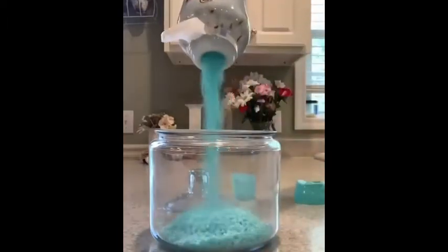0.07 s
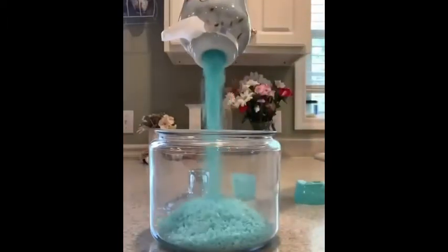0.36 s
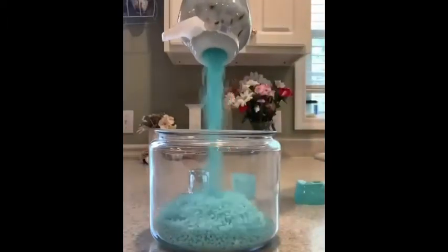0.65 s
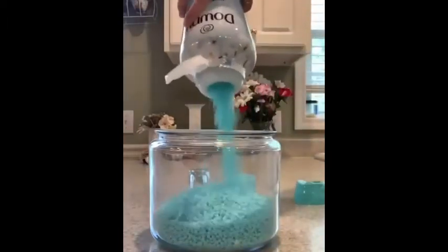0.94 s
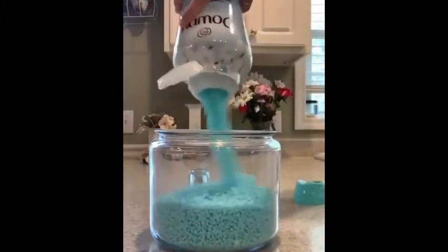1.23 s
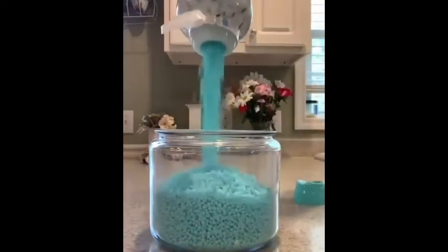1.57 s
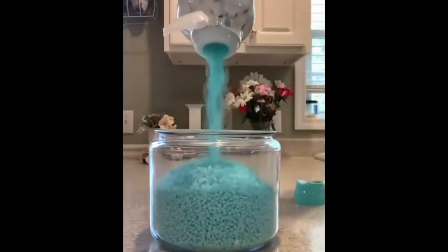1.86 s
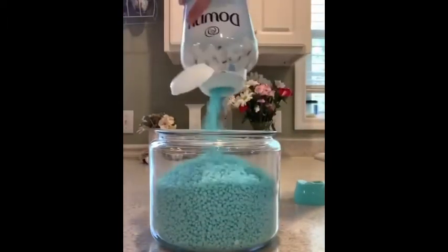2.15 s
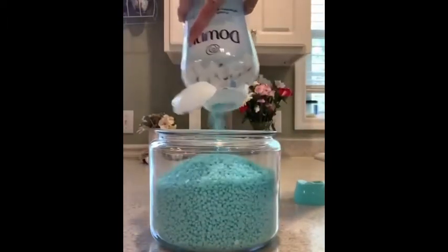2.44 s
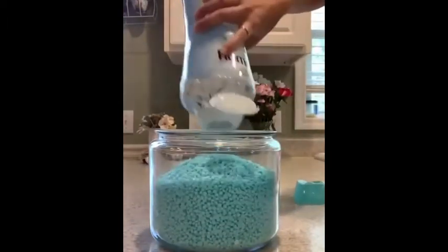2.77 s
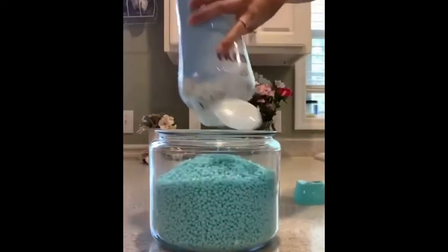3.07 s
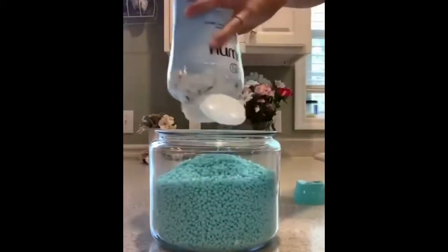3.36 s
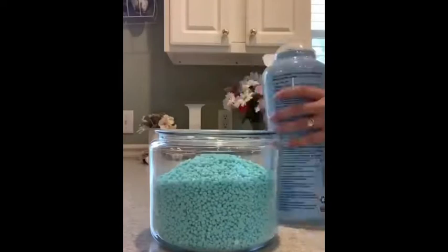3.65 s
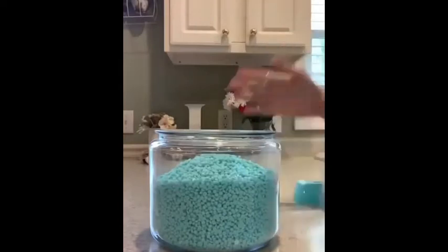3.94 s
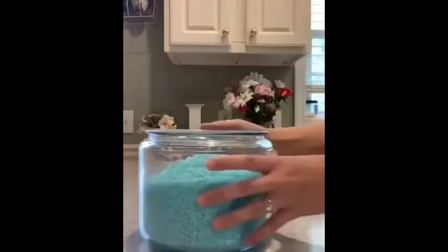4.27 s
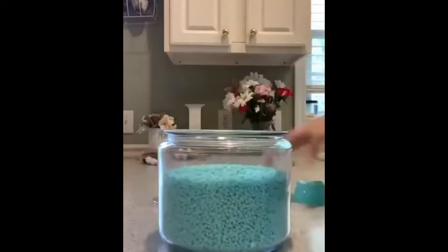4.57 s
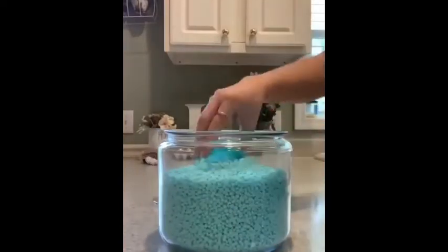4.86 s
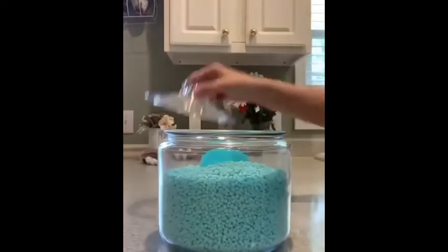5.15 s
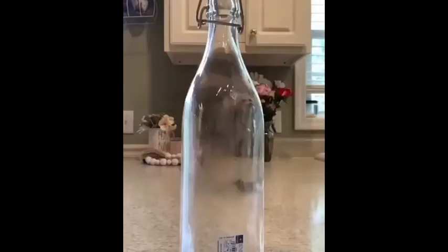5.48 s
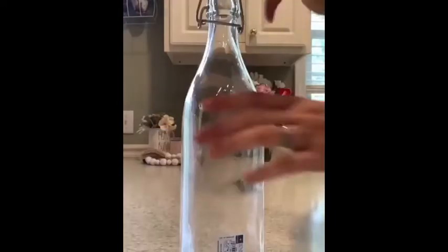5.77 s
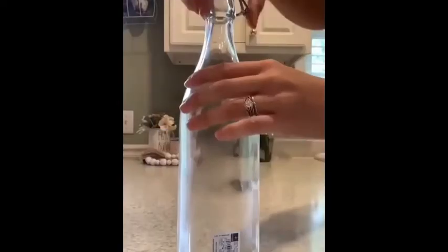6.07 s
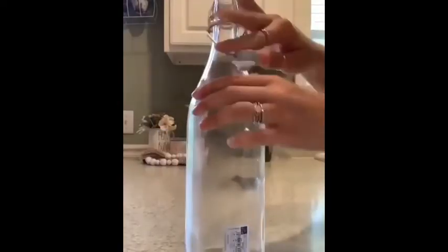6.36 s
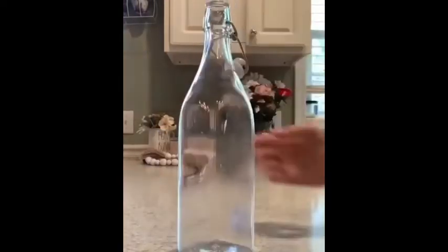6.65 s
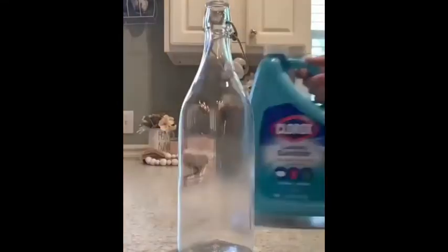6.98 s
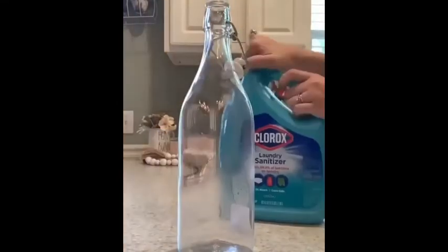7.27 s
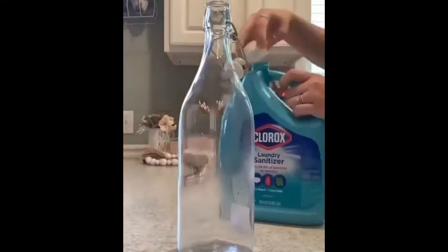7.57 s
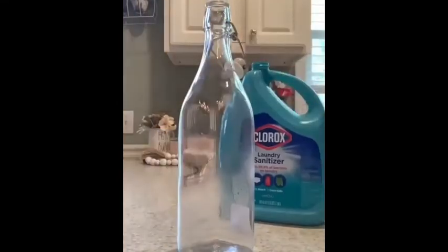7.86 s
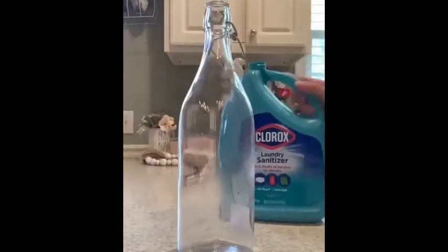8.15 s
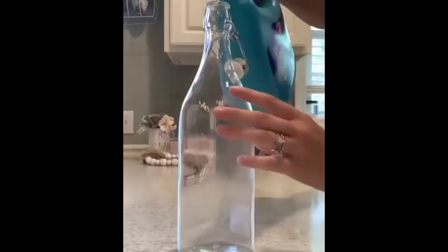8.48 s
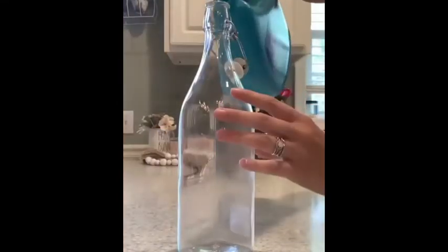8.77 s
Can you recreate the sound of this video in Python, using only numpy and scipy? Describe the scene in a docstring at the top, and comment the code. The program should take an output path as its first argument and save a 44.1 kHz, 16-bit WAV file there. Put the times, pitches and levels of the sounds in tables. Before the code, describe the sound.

From the start, small beads pour from a plastic bottle into a glass jar, a soft, steady fizz and patter with faint pings on the glass. The stream runs out near 2.9 seconds, and the hollow bottle is shaken in quick booming jolts, shedding the last beads. From 3.4 to 4.2 seconds it bumps and knocks as it is put down. At 4.4 the jar thuds and rocks on the counter, the beads shifting, and a cap drops softly onto them near 5. The glass lid clatters on briefly at 5.5. At 6.1 a glass bottle thuds loudly and its wire clasp snaps open, clicking again near 6.5 as the bottle judders along the worktop. A full jug lands with a low bump at 7.2, and its plastic cap rasps in short twists until about 8.3, loudest near 7.9. Everything is close, with a short kitchen echo over faint rumble and hiss.

```python
"""Small beads stream from a plastic bottle into a glass jar on a kitchen counter: thousands of tiny
collisions, strays ringing the wall. The bottle is shaken empty and put down, the jar jogged level; a cap
drops on the beads and the glass lid goes on. A swing-top glass bottle is unclasped and shoved along, then
a plastic jug is set down and its cap unscrewed. Blows are a crack, a crunch and damped modes; slides and
rubs are swelling bursts of grains. Close walls add echoes and a short tail, over low rumble and hiss."""
import sys
import numpy as np
from scipy import signal
from scipy.fft import rfft, irfft, next_fast_len
from scipy.io import wavfile
from scipy.ndimage import uniform_filter1d, map_coordinates

SR = 44100
rng = np.random.default_rng(int(sys.argv[2]) if len(sys.argv) > 2 else 0)


def to_wav(sig):
    """Store sig (one row per channel, or 1-D mono) as 16-bit WAV at the path in sys.argv[1].

    Samples outside -1..1 are clipped; the rate is SR.
    """
    pcm = np.clip(np.atleast_2d(sig), -1, 1) * 32767
    pcm = np.round(pcm).astype(np.int16)
    wavfile.write(sys.argv[1], SR, pcm.T)  # frames by channels


N = 388951
TIME_S = np.arange(N) / SR
AGE_S = np.arange(-SR // 6, SR // 3) / SR  # time around one contact

# noise spectrum of a blow: freq_hz, level_db
BLOW_SPECTRUM = [(50, -21.5), (130, 6), (500, -2.5), (1100, -3.5), (1700, -13), (4000, -23.5),
                 (8000, -23.5), (13000, -30)]


def pour():
    """Thousands of beads a second land on the heap; strays ping the glass wall."""
    # stream from the neck: time_s, fizz_db, patter_db
    stream = [(0.0, -57, -55), (0.04, -57, -59), (0.37, -52, -58), (0.48, -54, -59), (0.49, -49, -57),
              (0.85, -53, -57), (0.95, -47, -52), (0.99, -54, -57), (1.15, -48, -53), (1.56, -58, -59),
              (1.85, -56, -58), (2.03, -60, -60), (2.48, -56, -55), (2.6, -59, -56)]
    # spectra of beads on beads and of the heap's thrum: freq_hz, level_db
    fizz_spectrum = [(3000, -15), (6000, -6.5), (8900, 2.5), (11000, 1), (12700, 3), (14000, -5.5)]
    patter_spectrum = [(400, -12.5), (700, -7), (1050, 0), (1450, -11), (2400, -1.5), (4300, -1.5),
                       (5100, -5.5), (7000, -4.5), (10000, -24.5)]
    thrum_spectrum = [(24, -55), (40, -34), (65, -17.5), (136, 4.5), (299, -2.5), (413, -5.5), (578, -16),
                      (700, -14.5), (910, -39), (1540, -120)]
    # glass wall: pitch_hz, level_db, t60_s
    jar_modes = [(1107, -11, 0.19), (2410, -7, 0.037), (2917, -5.5, 0.16), (3388, -8, 0.078),
                 (3900, -7.5, 0.06), (4270, -4, 0.019), (5693, -1.5, .11), (8910, -22.5, .06),
                 (12500, 1.5, .05)]
    # envelopes: time_s, level_db
    thrum_level = [(0.0, -62), (0.09, -58), (1.08, -59), (1.73, -55), (2.6, -60), (2.82, -70)]
    wall_level = [(0, -3.5), (.7, -2.5), (1.2, .5), (1.8, -2.5), (2.8, -9)]  # rings less as the heap covers it
    run_out = [(2.6, 0), (2.85, -2), (2.95, -40), (3.05, -120)]
    time_s, fizz_db, patter_db = np.transpose(stream)
    fizz_gain = amp(np.interp(TIME_S, time_s, fizz_db) + .5)
    patter_gain = amp(np.interp(TIME_S, time_s, patter_db) - 1.7)
    clumps = amp(1.3 * wobble(25) + 1.1 * wobble(110))  # the stream leaves in lumps
    fizz = coloured(grains(N, rate_per_s=13000, spread_db=.5), fizz_spectrum)
    patter = coloured(grains(N, rate_per_s=9000, spread_db=2.5), patter_spectrum)
    strays = grains(N, rate_per_s=350, spread_db=2.5)
    # the wandering stream favours one mode, then another
    wall = unit(sum(amp(mode[1] + 3 * wobble(9)) * resonate(strays, [mode]) for mode in jar_modes))
    glassy = clumps * patter + envelope(wall_level) * wall
    thrum = envelope(thrum_level) * noise(N, thrum_spectrum)
    return envelope(run_out) * (fizz_gain * clumps * fizz + patter_gain * glassy + thrum)


def bead_bottle():
    """The hollow bottle booms as it is shaken and put down; loose beads slide after each jolt."""
    # upturned bottle jolted: start_s, thump_db, boom_db
    jolts = [(2.874, -19.5, -18.5), (2.936, -15.5, -31), (3.003, -15.5, -12.5), (3.066, -19, -25),
             (3.077, -21, -16), (3.124, -16, -18), (3.21, -19, -13.5)]
    # empty bottle and cap put down: start_s, level_db, hardness_db_per_oct, thump_db
    bumps = [(3.403, -24, -3.8, -6), (3.712, -49, -3, -8), (3.75, -27, -4.4, -3), (3.761, -12.5, -7.7, -4),
             (3.862, -35, -6.5, 3), (3.9, -25.5, -4.9, 0), (3.913, -19.5, -4.4, -11),
             (3.921, -21.5, -3, -7), (3.974, -14, -3.4, -19), (4.018, -37, -6.5, -8),
             (4.152, -18, -5.8, -2), (4.205, -36, -7.5, -1)]
    # plastic shell: pitch_hz, level_db, t60_s
    shaken_modes = [(154.7, -1, 0.12), (207, -5.5, 0.061), (300, -9, 0.065), (422, -0.5, 0.15),
                    (544, -5.5, 0.056), (962, -9, 0.087), (1190, -15, 0.035)]
    empty_modes = [(142.4, -1.5, 0.16), (207.3, 0.5, 0.13), (312.8, -8, 0.026), (416.5, -3.5, 0.079),
                   (535, -2.5, 0.076), (955, -3.5, 0.056), (1212, -12.5, .05), (1349, -14, .05),
                   (2280, -21.5, .04), (3336, -19.5, .05), (4000, -22.5, .04)]
    # sliding clumps: start_s, level_db, t60_s
    slides = [(2.630, -46.5, .2), (2.702, -43, .06), (2.733, -44, .07), (2.948, -26, .15), (3.17, -44, .3),
              (3.236, -35, .05), (3.587, -59, .13), (4.02, -47, .3), (4.18, -43, .35), (4.316, -54.5, .06),
              (4.945, -51.5, .2), (4.990, -44, .22), (5.09, -61, .3)]
    # sliding beads: freq_hz, level_db
    slide_spectrum = [(300, -6.5), (1000, -0.5), (1500, -2), (2500, -0.5), (4200, -1), (7000, -1.5),
                      (9500, -3.5), (13000, -2.5)]
    jolt_bands = [(s, thump_db, boom_db, boom_db - 17) for s, thump_db, boom_db in jolts]
    shaking = blows(jolt_bands, shaken_modes, BLOW_SPECTRUM,
                    crunch_db=3.5, crack_db=6.5, rise_s=.0037, t60_s=.045)
    bump_bands = band_levels(bumps, colour_db=(0, 0, .5, -1, .5))
    bumping = blows(bump_bands, empty_modes, BLOW_SPECTRUM,
                    crunch_db=3, crack_db=15, rise_s=.005, t60_s=.075)
    shed = following(jolts, lag_s=.015, level_db=-42.5, t60_s=.42, loss_db=.8)
    last_beads = following(bumps, lag_s=.02, level_db=-55, t60_s=.28, loss_db=.2)
    sliding = strokes(paced(slides + shed + last_beads, rise_share=.06), slide_spectrum, rate_per_s=9000)
    return amp(-4) * shaking + amp(-6) * bumping + amp(-.5) * sliding


def counter():
    """Jar, glass bottle and jug thud and rub on the worktop, the cap and lid knock dully; the heap shifts as
    the jar rocks."""
    # bases bumping, plus the cap landing and a dull lid knock: start_s, level_db, hardness_db_per_oct, thump_db
    knocks = [(4.384, -19.5, -10.6, 8), (4.393, -16.5, -8.6, -6), (4.759, -47, -7.6, -16),
              (4.95, -52, -8, 5), (4.982, -45, -3, 3), (5.226, -35, -10.6, -5), (5.562, -37, -4.8, -19),
              (6.111, -9.5, -5.6, 0), (6.139, -17.5, -9, 4), (6.437, -46, -2, 21),
              (6.634, -15.5, -10.2, 5.5), (6.757, -46, -10.4, 11), (7.161, -42, -7, 12),
              (7.199, -35, -10, 5), (7.307, -42, -9, 7), (7.431, -42, -7.6, 7), (7.505, -39, -9, 0),
              (7.783, -34, -5, 7), (8.057, -26, -6.6, -7)]
    # worktop: pitch_hz, level_db, t60_s
    counter_modes = [(106, -9, .1), (140.9, 1, 0.059), (191.4, -2.5, 0.059), (226.6, -3, 0.14),
                     (292.9, -3.5, .1), (398, -7.5, .08), (530, -11.5, 0.049), (748, -14.5, 0.066),
                     (955, -4.5, 0.1), (1163, -14.5, 0.1), (1240, -14, 0.045)]
    # runs of blows: start_s, gap_s, gap_ratio, loss_db, level_db, hardness_db_per_oct, thump_db
    jar_rocking = (4.457, .092, .76, 8, -29, -9, 6)
    bottle_stick_slip = (6.533, .016, 1.11, 1.1, -15, -9.7, 7)
    # hands and bases rubbing: start_s, level_db, t60_s
    rubs = [(4.31, -47.5, .3), (4.52, -43, .22), (4.63, -45, .07), (5.995, -53, .08), (6.25, -51, .11),
            (6.335, -42.5, .23), (6.48, -32, .19), (6.70, -42, .22), (7.628, -42, .15), (7.735, -41.5, .3),
            (8.31, -56, .25)]
    # heap flattening: start_s, level_db, rise_s, t60_s
    shifts = [(4.398, -33, .006, .1), (4.485, -42, .05, .22), (4.55, -49, .03, .2), (4.61, -52, .025, .09)]
    # friction spectra: freq_hz, level_db
    rub_spectrum = [(60, -19.5), (130, -2), (280, -3), (450, -9), (950, -21), (1500, -28.5), (4000, -37.5),
                    (13000, -53.5)]
    shift_spectrum = [(300, -8), (700, -7), (1000, 3), (1400, -9), (2200, -12), (4000, -21), (13000, -24)]
    hits = knocks + dying_run(jar_rocking, count=3) + dying_run(bottle_stick_slip, count=5)
    bands = band_levels(hits, colour_db=(0, 0, -.3, -1, .5))
    thuds = blows(bands, counter_modes, BLOW_SPECTRUM, crunch_db=4, crack_db=12, rise_s=.005, t60_s=.09)
    rubbing = strokes(paced(rubs, rise_share=.11), rub_spectrum, rate_per_s=12000)
    shifting = strokes(shifts, shift_spectrum, rate_per_s=9000)
    return amp(-7) * thuds + amp(-1) * rubbing + shifting


def jar_lid():
    """The glass lid clatters onto the rim."""
    # lid settling: start_s, level_db, hardness_db_per_oct, thump_db
    hits = [(5.464, -29, -7.5, 2), (5.477, -14, -7, -9), (5.483, -30, -3.5, 14), (5.493, -12, -5.4, -7)]
    # lid on jar: pitch_hz, level_db, t60_s
    lid_modes = [(129, 5.5, .1), (220, -5.5, .08), (348, -6, .08), (433, -7, 0.052), (724, -16, .07),
                 (965, 8, 0.0578), (1164, 5.5, 0.055), (1272, -3, 0.079), (2070, -16.5, .07),
                 (2700, -14.5, 0.04), (3724, -16, .08), (5000, -21, .09), (5572, -24.5, .13),
                 (6212, -19, 0.11)]
    bands = band_levels(hits, colour_db=(0, -5.5, 8, 2, -3.5))
    clatter = blows(bands, lid_modes, BLOW_SPECTRUM, crunch_db=3, crack_db=0, rise_s=.007, t60_s=.07)
    return amp(-9.5) * clatter


def swing_top():
    """The wire clasp snaps open; the stopper scuffs out and hits the neck, brighter when harder."""
    # clasp and stopper hits: start_s, level_db
    snaps = [(6.0916, -36.5), (6.1075, -32.5), (6.2442, -61), (6.3044, -51), (6.3275, -44), (6.3444, -48),
             (6.4283, -49), (6.4544, -44), (6.4762, -23), (6.4864, -24), (6.6364, -54), (8.5693, -78)]
    # wire clasp: pitch_hz, level_db, t60_s
    wire_modes = [(1830, -5.5, 0.23), (2900, -17.5, .12), (3020, -8.5, 0.14), (3530, -16.5, .16),
                  (4060, -6.5, 0.15), (4187, -9, 0.27), (4830, -15, .22), (5440, -10, .09),
                  (5643, 3.5, .11), (6235, -4.5, .07), (7000, -10.5, .09), (7160, -10, 0.11),
                  (9100, -17, .07), (9604, -19.5, .07)]
    # stopper leaving the neck: start_s, level_db, rise_s, t60_s
    unseal = [(6.102, -37, .006, .1)]
    # contact spectra: freq_hz, level_db
    steel_on_glass = [(1500, -11), (3000, -1), (4200, -0.5), (4800, -12.5), (5700, -1), (7300, -7.5),
                      (9500, -16.5), (13000, -21.5)]
    rubber_on_glass = [(1000, -14), (4000, -3), (9000, -1), (13000, 0)]
    start_s, level_db = np.transpose(snaps)
    tilt_db = .22 * (level_db + 35)
    bands = zip(start_s, level_db - 19, level_db - tilt_db, level_db + tilt_db)  # clack, click, tick
    clasp = blows(bands, wire_modes, steel_on_glass,
                  crunch_db=3, crack_db=6, rise_s=.006, t60_s=.07, first_band=2)
    return amp(-8.5) * clasp + strokes(unseal, rubber_on_glass, rate_per_s=12000)


def jug():
    """The full jug lands with a low bump; its plastic thread sticks and slips at each twist."""
    # base touching down, edge first: start_s, level_db
    landing = [(7.165, -40.5), (7.207, -24.5)]
    # filled belly, hollow neck: pitch_hz, level_db, t60_s
    belly_modes = [(118.3, -3.5, 0.15), (163, -16, .1)]
    neck_modes = [(339, -2, 0.017), (579, -7, .02), (774, -4.5, 0.016), (1261, -5.5, 0.017),
                  (1773, -2, .012), (2470, 2, .01), (3350, 3.5, 0.01), (4580, 0, .007), (6520, 3, 0.0089)]
    # cap twists: start_s, level_db, t60_s
    twists = [(7.175, -54, .5), (7.342, -41.5, .13), (7.502, -44, .1), (7.542, -45.5, .16),
              (7.625, -45.5, .17), (7.720, -41, .22), (7.832, -25, .18), (7.860, -24.5, .1),
              (7.870, -20.5, .06), (7.93, -42, .18), (8.112, -30, .13), (8.26, -59, .35)]
    # thread rasp: freq_hz, level_db
    rasp_spectrum = [(60, -30), (140, -1.5), (240, -11), (340, 0.5), (750, 0.5), (1300, 0), (2200, -7),
                     (4000, -6), (5500, -5.5), (7000, -8.5), (13000, -13.5)]
    bump = np.zeros(N)
    for start_s, level_db in landing:
        add(bump, start_s, amp(level_db) * ring(belly_modes, scatter_db=2, rise_s=.01))
    rasp = strokes(paced(twists, rise_share=.055), rasp_spectrum, rate_per_s=4000, modes=neck_modes)
    return bump + amp(-3.87) * rasp


def walls(x):
    """Close hard surfaces add early copies that comb the upper range."""
    # counter, tiles, cabinets: delay_s, level_db
    echoes = [(.0011, -23.5), (.0029, -20.5), (.0047, -12.5), (.0083, -18.5)]
    bright = signal.sosfilt(signal.butter(1, 900, "highpass", fs=SR, output="sos"), x)
    return x + sum(amp(db) * np.interp(TIME_S - delay_s, TIME_S, bright) for delay_s, db in echoes)


def room(x):
    """The kitchen's short tail, each frequency dying at its own speed."""
    # reverberation: freq_hz, t60_s
    decay = [(100, 0.51), (500, 0.3), (3000, 0.33), (12000, 0.12)]
    freq_hz, time_s, bins = signal.stft(rng.standard_normal(SR // 2), SR, nperseg=256)
    fade = amp(-60 * time_s / along(decay, freq_hz)[:, None])
    tail = signal.istft(bins * fade, SR, nperseg=256)[1]
    response = np.pad(tail, (SR // 200, 0)) / np.linalg.norm(tail)  # 5 ms pre-delay
    return signal.fftconvolve(x, response)[:N]


def air():
    """A restless low rumble that rises with handling, over faint steady hiss."""
    # handling peaks: time_s, level_db
    peaks = [(4.35, -54), (6.5, -50), (7.65, -59)]
    # background spectra: freq_hz, level_db
    rumble_spectrum = [(25, -12), (80, -7.5), (145, 0.5), (300, -6.5), (600, -28.5), (1500, -45.5),
                       (4000, -65)]
    hiss_spectrum = [(500, -4), (2000, -0.5), (5000, -4.5), (14000, -9.5)]
    rest_db, slope_db_per_s = -71.5, 42
    handling_db = np.max([db - slope_db_per_s * np.abs(TIME_S - s) for s, db in peaks], axis=0)
    rumble_db = np.maximum(handling_db, rest_db) + 2.8 * wobble(7)
    return amp(rumble_db) * noise(N, rumble_spectrum) + amp(-86) * noise(N, hiss_spectrum)


def blows(rows, modes, spectrum, crunch_db, crack_db, rise_s, t60_s, first_band=0):
    """Crack, crunch and ringing modes. Rows: start_s, then level_db per band from first_band up."""
    # thump, knock, clack, click, tick
    bands_hz = [(105, 300), (300, 700), (700, 2000), (2000, 5000), (5000, 13000)]
    filters = [signal.butter(3, band, "bandpass", fs=SR, output="sos") for band in bands_hz[first_band:]]
    crack = coloured(1. * (AGE_S == 0), spectrum)
    track = np.zeros(N)
    for start_s, *levels_db in rows:
        crunch = noise(len(AGE_S), spectrum) * swell(rise_s, t60_s)
        body = ring(modes, scatter_db=2.5, rise_s=rise_s / 2)
        sound = body + amp(crunch_db) * crunch + amp(crack_db) * crack / crack.max()
        for sos, level_db in zip(filters, levels_db):
            part = signal.sosfilt(sos, sound)  # narrow low bands build last: thump trails click
            peak_rms = np.sqrt(uniform_filter1d(part ** 2, size=440).max())
            add(track, start_s, amp(level_db) * part / peak_rms)
    return track


def band_levels(hits, colour_db):
    """A harder contact tilts the body's five bands to the treble; a heavier one adds thump."""
    octaves = np.log2(np.array([458, 458, 1183, 3162, 8062]) / 458)  # above the knock band
    rows = []
    for start_s, level_db, hardness_db_per_oct, thump_db in hits:
        levels_db = level_db + np.array(colour_db) + hardness_db_per_oct * octaves
        levels_db[0] += thump_db
        rows.append((start_s, *levels_db))
    return rows


def dying_run(run, count):
    """Ever weaker blows whose gaps change by a steady ratio."""
    start_s, gap_s, gap_ratio, loss_db, level_db, *tone = run
    return [(start_s + gap_s * np.sum(gap_ratio ** np.arange(k)), level_db - k * loss_db, *tone)
            for k in range(count)]


def strokes(rows, spectrum, rate_per_s, modes=None):
    """Bursts of grains that swell and fade, partly through a hollow body if given."""
    track = np.zeros(N)
    for start_s, level_db, rise_s, t60_s in rows:
        grit = unit(grains(len(AGE_S), rate_per_s, spread_db=2))
        if modes is not None:
            # each grip bends the soft body and shifts its modes
            gripped = [(hz * np.exp(.13 * rng.standard_normal()), *rest) for hz, *rest in modes]
            grit = grit + .6 * resonate(grit, gripped)
        add(track, start_s, amp(level_db) * swell(rise_s, t60_s) * coloured(grit, spectrum))
    return track


def following(hits, lag_s, level_db, t60_s, loss_db):
    """One stroke after each hit, each weaker than the last."""
    return [(s + lag_s, level_db - k * loss_db, t60_s) for k, (s, *_) in enumerate(hits)]


def paced(rows, rise_share):
    """Longer strokes build up more slowly."""
    return [(start_s, level_db, rise_share * t60_s, t60_s) for start_s, level_db, t60_s in rows]


def ring(modes, scatter_db, rise_s):
    """Damped modes in close, beating pairs, at new strengths each time."""
    sound = np.zeros(len(AGE_S))
    for pitch_hz, level_db, t60_s in modes:
        twin_hz = pitch_hz * (1 + .0025 * rng.standard_normal())
        pair = np.sin(2 * np.pi * pitch_hz * AGE_S) + .5 * np.sin(2 * np.pi * twin_hz * AGE_S)
        sound += amp(level_db + scatter_db * rng.standard_normal()) * swell(rise_s, t60_s) * pair
    return sound


def resonate(x, modes):
    """x through a body's modes, at rms 1."""
    t = AGE_S[AGE_S >= 0]
    response = sum(amp(db - 60 * t / t60_s) * np.sin(2 * np.pi * hz * t) for hz, db, t60_s in modes)
    return unit(signal.fftconvolve(x, response)[:len(x)])


def grains(length, rate_per_s, spread_db):
    """Tiny collisions of random timing and size."""
    hit = rng.random(length) < rate_per_s / SR
    return hit * rng.standard_normal(length) * amp(spread_db * rng.standard_normal(length))


def swell(rise_s, t60_s):
    """Contact pressure builds, then dies away."""
    return np.exp(np.minimum(AGE_S, 0) / max(rise_s, 1e-4)) * amp(-60 * np.maximum(AGE_S, 0) / t60_s)


def wobble(knots_per_s):
    """Smooth random curve."""
    return map_coordinates(rng.standard_normal(int(N * knots_per_s / SR) + 4), [TIME_S * knots_per_s])


def noise(length, spectrum):
    """Shaped noise at rms 1."""
    return coloured(rng.standard_normal(length), spectrum)


def coloured(x, spectrum):
    """x shaped by a spectrum, at rms 1."""
    size = next_fast_len(len(x) + 4096)
    gain = amp(along(spectrum, np.fft.rfftfreq(size, 1 / SR)))
    return unit(irfft(rfft(x, size) * gain, size)[:len(x)])


def along(points, freq_hz):
    """(freq_hz, value) points read on a log axis."""
    knots_hz, values = np.transpose(points)
    return np.interp(np.log(freq_hz + 1), np.log(knots_hz), values)


def envelope(points):
    """Gain curve through (time_s, level_db) points."""
    return amp(np.interp(TIME_S, *np.transpose(points)))


def add(track, contact_s, sound):
    """Mix in a sound with its contact at contact_s."""
    start = round((contact_s + AGE_S[0]) * SR)
    track[start:start + len(sound)] += sound[:N - start]


def amp(db):
    """Decibels to gain."""
    return 10 ** (np.asarray(db) / 20)


def unit(x):
    """Scale to rms 1."""
    return x / np.sqrt(np.mean(x ** 2) + 1e-20)


def scene():
    """All sources close by, in mono."""
    # brief level dip that cuts the lid's ring short: time_s, level_db
    dip = [(5.572, 0), (5.58, -25), (5.8, -25), (5.9, 0)]
    near = walls(pour() + bead_bottle() + counter() + jar_lid() + swing_top() + jug())
    tail = amp(-27) * room(near)
    return (envelope(dip) * (near + tail) + air())[None]


def record(dry):
    """Steep low-pass."""
    cutoff_hz = 13250
    size = next_fast_len(N + SR)
    gain = np.interp(np.fft.rfftfreq(size, 1 / SR), [cutoff_hz - 150, cutoff_hz + 150], [1, 0])
    return irfft(rfft(dry, size) * gain, size)[:, :N]


dry = scene()
out = record(dry)
to_wav(out)
```